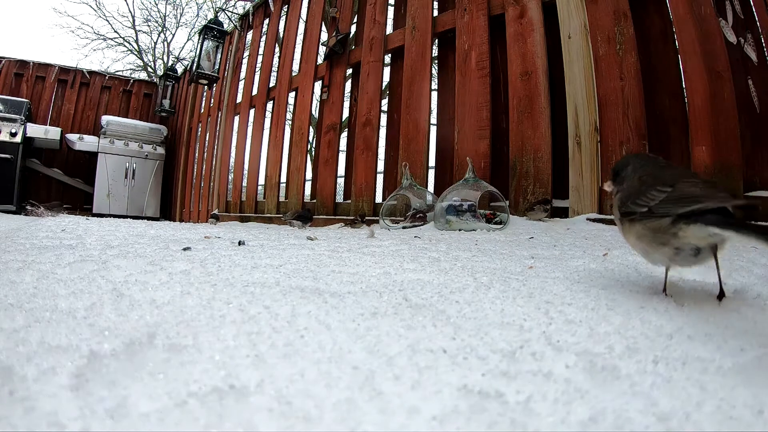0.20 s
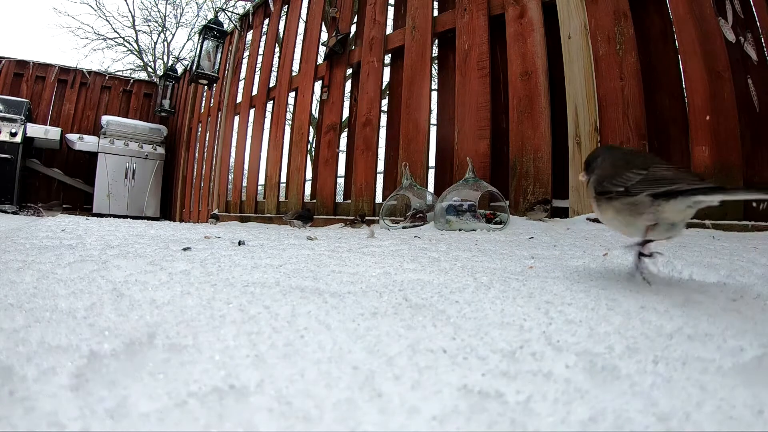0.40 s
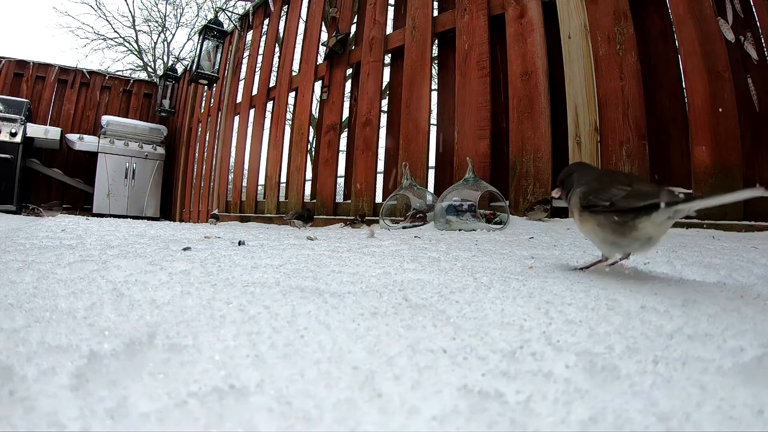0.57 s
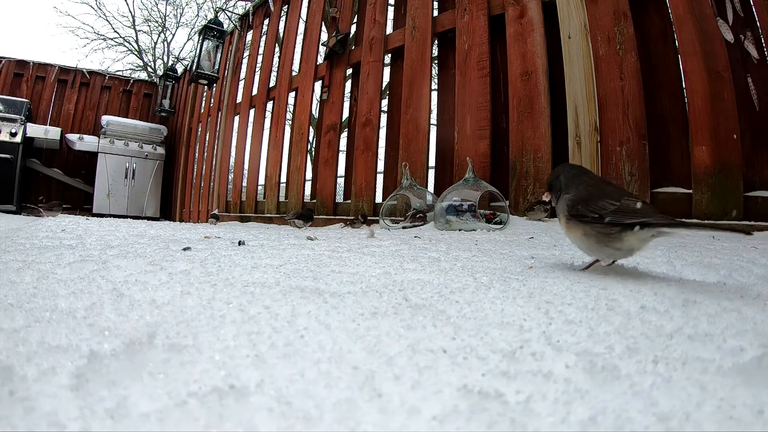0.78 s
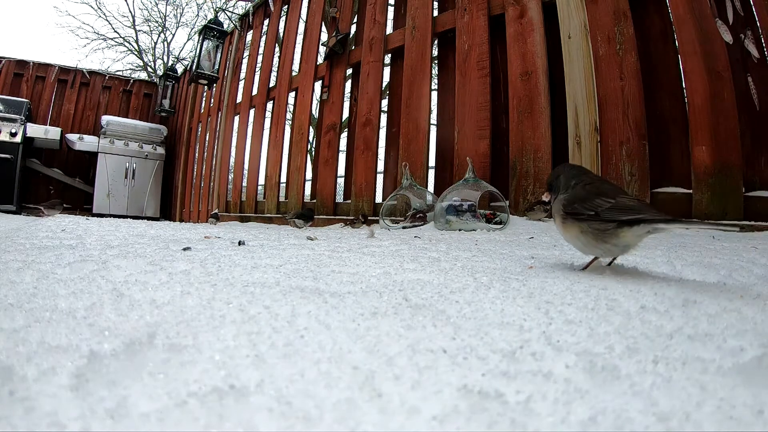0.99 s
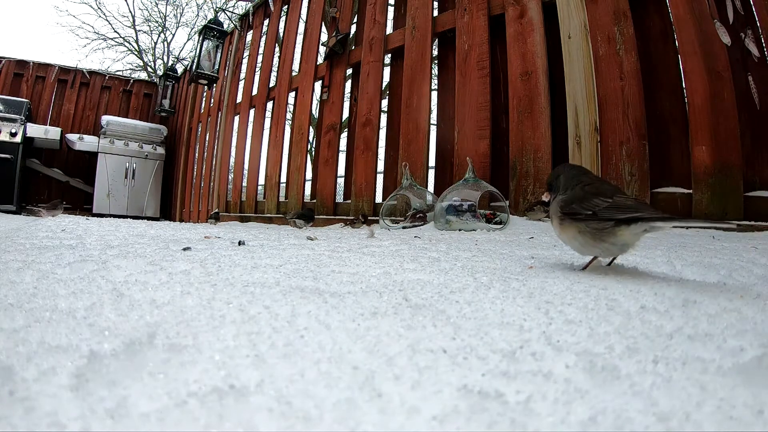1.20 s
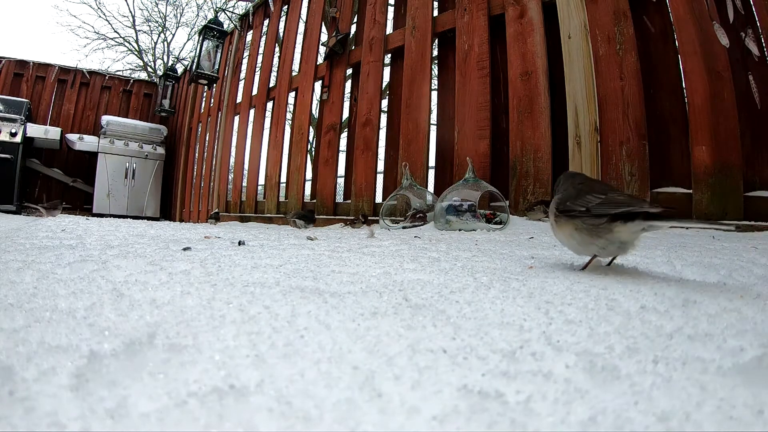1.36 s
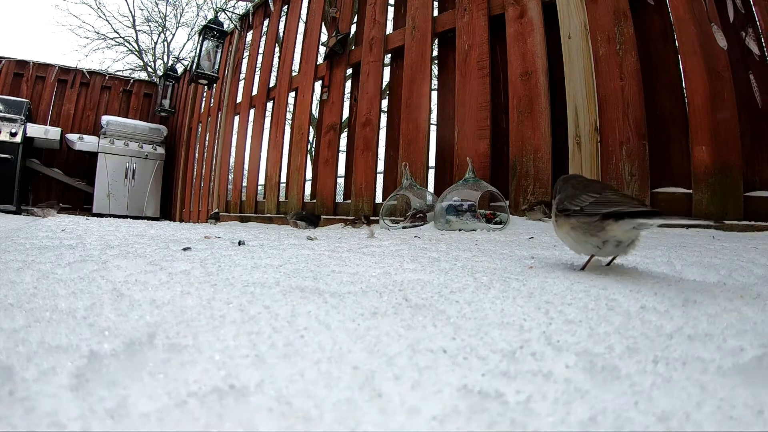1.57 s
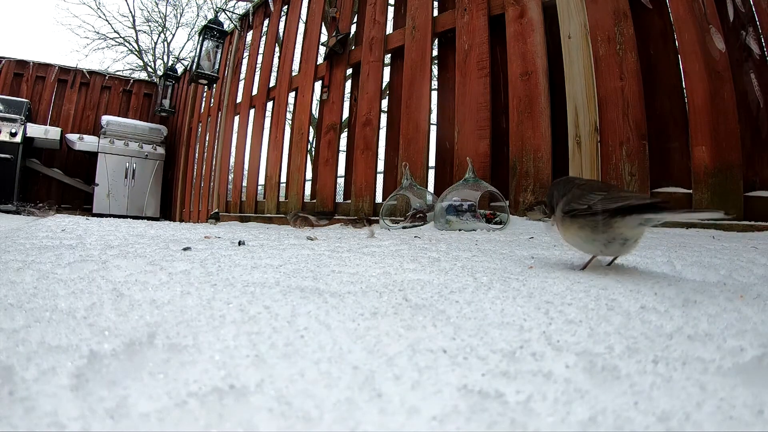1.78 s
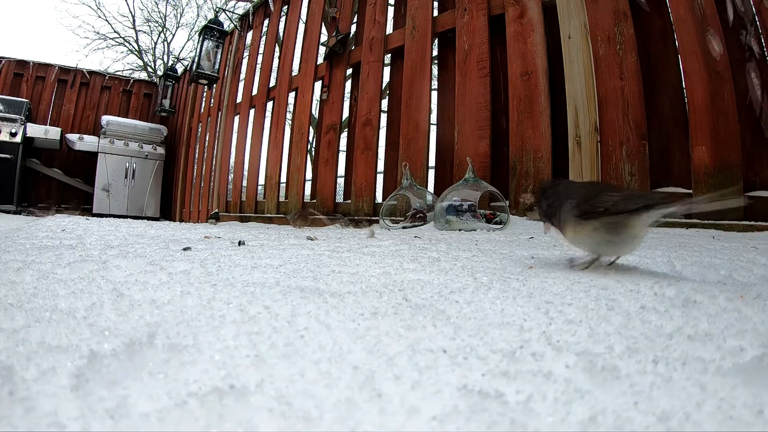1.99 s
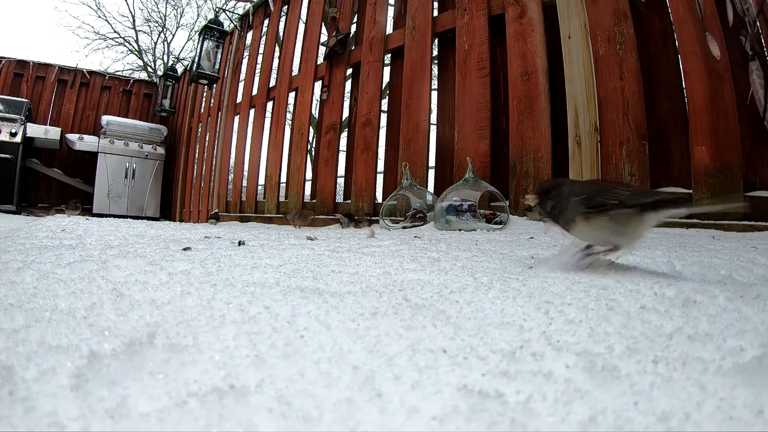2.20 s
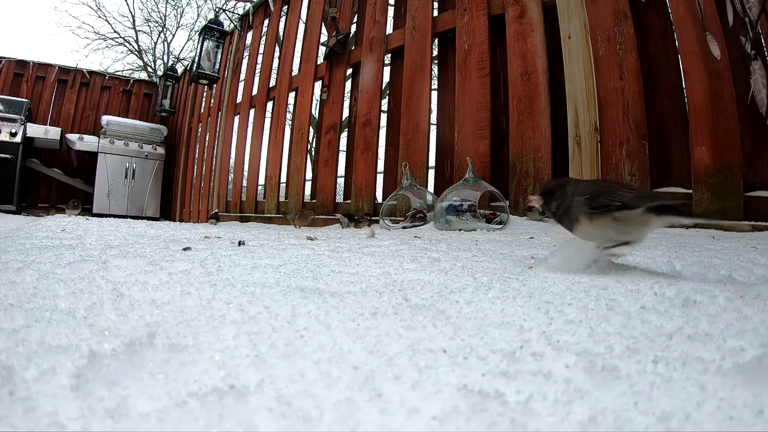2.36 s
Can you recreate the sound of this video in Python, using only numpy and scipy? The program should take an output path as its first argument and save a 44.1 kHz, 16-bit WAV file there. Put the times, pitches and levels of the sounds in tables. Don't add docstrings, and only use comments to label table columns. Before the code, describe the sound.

Ice pellets tick on crusted snow, close and mostly left, over faint distant patter, soft outdoor hush and low wind rumble differing on each side. At 0.2 s a heavy pellet shatters in grains with a deep housing thump. Irregular clicks, skids and small crunches continue, with wind puffs from 0.5 to 1.5 s, denser ticks around 1.2-1.7, and sharp hits and knocks at 2.1-2.25 s.

```python
import sys
import numpy as np
from scipy import signal
from scipy.fft import rfft, irfft
from scipy.io import wavfile
from scipy.ndimage import uniform_filter1d, minimum_filter1d

SR = 44100
rng = np.random.default_rng(int(sys.argv[2]) if len(sys.argv) > 2 else 0)


def store_wav(level_fs):
    pcm = np.round(np.clip(np.atleast_2d(level_fs), -1, 1) * 32767)
    wavfile.write(sys.argv[1], SR, pcm.T.astype(np.int16))


def volts(x):
    e = np.asarray(x, float) / 20
    return 10 ** e


N = 112455

# start_s, peak_db, ring_hz, left_right_db, t60_s
LOUD_PELLETS = [(0.084, -31, 3160, -27, 0.0069), (0.2087, -11.5, 2740, 42, 0.0024),
                (0.3104, -29.5, 6300, 31, 0.0066), (0.3787, -23, 11800, 5, 0.012),
                (0.4297, -25, 12900, 30, 0.0041), (0.5188, -16, 10040, 39, 0.0097),
                (0.7402, -36, 2750, -8, 0.0085), (0.7806, -20, 12800, 21, 0.012),
                (0.9015, -18, 5270, 44, 0.011), (1.0043, -23.5, 5050, 22, 0.0054),
                (1.129, -29.5, 10900, 24, 0.0053), (1.1756, -28, 5130, 22, 0.0089),
                (1.278, -25, 12400, 3, 0.019), (1.3348, -24, 6360, 29, 0.0034),
                (1.4416, -33.5, 3370, 5.5, 0.015), (1.455, -29, 6460, 23, 0.012),
                (1.6024, -26, 6060, 36, 0.0046), (1.999, -28, 12800, 0, 0.015),
                (2.1243, -14, 9700, 40, 0.02), (2.173, -30, 2930, 32, 0.0063),
                (2.1929, -32.5, 6550, 19, 0.0053), (2.415, -32.5, 3230, 20, 0.0065)]
# start_s, peak_db, ring_hz, left_right_db
SOFT_PELLETS = [(0.3834, -31, 3330, 9), (0.4728, -40, 4380, 0), (0.535, -42, 2710, -8),
                (0.5889, -36.5, 12100, 6), (0.637, -40.5, 4610, 18), (0.7187, -40, 4760, 7),
                (0.7988, -39, 8120, -5), (0.822, -35.5, 11500, 12.5), (0.838, -35, 9100, 20),
                (0.952, -31, 11900, 6), (1.034, -35.5, 5730, 3), (1.0452, -32, 7000, 13),
                (1.114, -39, 4460, 11), (1.1375, -40, 3040, 24), (1.1632, -37, 5360, -6),
                (1.243, -39.5, 5600, 18), (1.4148, -29.5, 7990, 17), (1.5695, -33.5, 5230, 20),
                (1.6506, -38.5, 3960, 1), (1.7435, -40, 3130, -12), (1.7944, -32, 9700, 12),
                (1.9057, -33, 6040, 8), (2.0878, -37, 5660, 7), (2.3968, -34.5, 9850, 23),
                (2.4359, -29.5, 11400, 0), (2.4975, -35.5, 5430, 27)]
# start_s, peak_db, ring_hz, left_right_db
MORE_PELLETS = [(.0333, -57, 6670, 2), (0.0547, -42, 5700, -9), (.1336, -53, 5490, -8),
                (0.1798, -41, 8810, -5), (.254, -50, 13000, 25), (0.3493, -43, 6000, 3),
                (0.396, -55, 6040, 5), (0.407, -49, 8900, 2), (.411, -49, 12500, 8), (.458, -50, 10000, 5),
                (.485, -43, 11000, 8), (.498, -46, 7000, 8), (.632, -39, 10000, 8),
                (0.693, -39.5, 7000, 15), (0.9303, -39, 7280, 11), (0.984, -42, 5000, 1),
                (1.1004, -50, 5000, 5), (1.2176, -27, 9670, 26), (1.265, -33, 12500, 8),
                (1.3275, -29, 7460, 14), (1.353, -35, 13000, 3), (1.36, -41, 12000, 10),
                (1.3806, -35, 7500, 0), (1.40, -32, 12100, 8), (1.4093, -32.5, 7000, 19),
                (1.4238, -37, 7500, 10), (1.4394, -30, 12100, 19), (1.464, -43, 8000, 10),
                (1.493, -38.5, 8950, 15), (1.5438, -46, 9000, 10), (1.553, -43, 8000, 10),
                (1.58, -38, 10000, 13), (1.591, -45, 6000, 8), (1.6033, -22.5, 12300, 28),
                (1.619, -39, 12000, 8), (1.6266, -43, 6870, 9), (1.664, -35.5, 10000, 11),
                (1.685, -40, 9000, 0), (1.743, -34, 10900, -1), (1.842, -44, 9000, 3),
                (2.0268, -47, 9000, -5), (2.0717, -36, 7000, 12), (2.114, -50, 11000, 20),
                (2.157, -48, 9000, 16), (2.2283, -48, 9000, 12), (2.2523, -28.5, 6440, 26),
                (2.428, -41, 8000, 12), (2.452, -35, 10500, 16)]
# start_s, level_db, length_s, centre_hz, left_right_db
SPRAYS = [(0.191, -48.5, 0.0093, 8000, 6), (0.2077, -20, 0.0096, 5000, 48), (0.213, -30.5, 0.015, 5500, 34),
          (0.685, -48, 0.032, 5560, 22), (0.737, -34.5, 0.01, 5900, 0), (0.788, -51.5, 0.067, 9000, 6),
          (1.209, -36, 0.004, 7100, 25), (1.294, -40.5, 0.034, 5400, 3), (1.402, -41, 0.022, 8000, 0),
          (1.453, -49, 0.019, 8100, 17), (1.792, -44, 0.024, 9700, 9), (1.924, -37, 0.016, 5000, 5.5),
          (2.125, -21, 0.0033, 6730, 40), (2.13, -35, 0.007, 6900, 28), (2.1705, -30.5, 0.005, 12100, 30),
          (2.308, -33, 0.015, 4500, 5.5), (2.323, -44, 0.015, 3500, 3), (2.402, -46, 0.013, 7000, 20)]
# start_s, level_db, length_s, centre_hz, left_right_db
CRUMBS = [
    (1.284, -38, 0.056, 21000, 7),
    (2.117, -41, 0.0078, 6900, 28),
    (1.9, -43, 0.0099, 4370, 26),
    (3.1, -52, 0.0065, 4300, 24),
    (1.907, -41, 0.0069, 3900, 10),
]
# start_s, peak_db, ring_hz, t60_s
HOUSING_KNOCKS = [(0.208, -8.5, 110, 0.12), (0.2245, -2.5, 48.7, 0.0606), (.246, -16, 28.4, .2),
                  (0.2093, -22, 2580, 0.067), (0.218, -15, 367, 0.041), (.903, -33.5, 2090, 0.066),
                  (2.072, -16, 287, 0.013), (2.127, -20.5, 249, 0.033), (2.132, -19.5, 110, 0.075),
                  (2.177, -18.5, 115, 0.013), (2.2526, -5.5, 2890, 0.0044), (2.252, -17, 1490, 0.0063)]
# start_s, peak_db, centre_hz, t60_s
NOISY_KNOCKS = [(.209, -21, 760, 0.057), (0.209, -23, 3020, 0.057), (.518, -37, 730, 0.021),
                (0.837, -40.5, 1500, 0.047), (0.877, -36, 950, 0.04), (0.9, -24.5, 845, 0.019),
                (1.51, -38, 740, 0.024), (1.925, -34, 437, 0.09), (2.072, -31, 1390, 0.02),
                (2.125, -22, 1490, 0.018), (2.128, -34.5, 320, 0.095), (2.252, -31.5, 487, 0.029),
                (2.1737, -29.5, 1540, 0.018), (2.415, -36, 870, 0.013)]
# time_s, level_db, left_right_db
GUSTS = [
    (0, -41, -2.5),
    (.35, -43, 2.5),
    (1.1, -39, -2),
    (1.7, -42, -1.5),
    (2.55, -43, 2.5),
]
# top_s, over_wind_db, half_length_s, port (1 left, -1 right)
PUFFS = [
    (0.513, 9, 0.039, -1),
    (0.701, 7.9, 0.056, 1),
    (.70, 8, 0.069, -1),
    (.885, 13, 0.035, -1),
    (.94, 8, 0.11, 1),
    (1.02, 8.1, 0.08, -1),
    (1.26, 7.3, 0.074, -1),
    (1.35, 8.5, 0.11, 1),
    (1.48, 5, 0.073, -1),
]
# freq_hz, density_db_per_hz
WIND_SPECTRUM = [(20, 2), (50, 3), (80, -7), (165, -18.5), (350, -31), (600, -37.5)]
# freq_hz, density_db_per_hz
HUSH_SPECTRUM = [(110, -10), (220, -3.5), (770, -7), (1200, -11), (4000, -22), (11000, -27), (14500, -28.5),
                 (16000, -40)]


def band(x, centre_hz, share, order=1):
    edges_hz = np.clip([centre_hz / (1 + share), centre_hz * (1 + share)], 20, 0.47 * SR)
    return signal.lfilter(*signal.butter(order, edges_hz, "band", fs=SR), x)


def add(out, x, start_s, left_right_db):
    far_delay_s, far_cutoff_hz = 0.001124, 5000
    gain_sum = volts(left_right_db / 2) + volts(-left_right_db / 2)
    for port, sign in enumerate((1, -1)):
        far = sign * left_right_db < 0
        first = int((start_s + far * far_delay_s) * SR)
        heard = x[port]
        if far:
            heard = signal.lfilter(*signal.butter(1, far_cutoff_hz, fs=SR), heard)
        part = out[port, first:first + len(heard)]
        part += heard[:len(part)] * 2 * volts(sign * left_right_db / 2) / gain_sum


def tick(peak_db, ring_hz, t60_s):
    attack_s, tail_db, tail_t60_s, crack_db = 0.00058, -44.5, 0.014, -5
    t = np.arange(1800) / SR
    noise = rng.standard_normal((2, len(t)))
    decay = volts(-60 * t / t60_s) + volts(tail_db - 60 * t / tail_t60_s)
    shape = np.clip(t / attack_s, 0, 1) * decay
    ring = band(noise * shape, ring_hz, 0.35, order=2)
    crack = band(noise[::-1] * shape, 6000, 1.8, order=2)
    crack_gain = volts(crack_db) * min(ring_hz / 5000, 1) ** 3
    x = ring / abs(ring).max() + crack_gain * crack / abs(crack).max()
    return x * volts(peak_db) / abs(x).max(axis=1, keepdims=True)


def spray(level_db, length_s, centre_hz, share=1.36):
    grains_per_s, grain_spread_db, dust = 1200, 5, 0.4
    t = np.arange(6000) / SR
    chance = rng.random((2, 2, len(t)))
    grain_db = np.minimum(-grain_spread_db * np.log(chance[1] + 1e-9), 9)
    grains = (chance[0] < grains_per_s / SR) * volts(grain_db)
    density = signal.lfilter([1], [1, -0.97], grains) + dust
    x = band(density * rng.standard_normal((2, len(t))), centre_hz, share, order=2)
    swell = np.clip(t / (0.0013 + 0.098 * length_s), 0, 1)
    tail = np.exp(-np.clip(t - length_s, 0, 1) / (0.4 * length_s))
    shape = swell * volts(-7 * t / length_s) * tail
    return x / x[:, t < length_s].std(axis=1, keepdims=True) * shape * volts(level_db)


def pellets():
    out = np.zeros((2, N))
    for start_s, peak_db, ring_hz, left_right_db, t60_s in LOUD_PELLETS:
        add(out, tick(peak_db, ring_hz, t60_s), start_s, left_right_db)
    for start_s, peak_db, ring_hz, left_right_db in SOFT_PELLETS:
        add(out, tick(peak_db, ring_hz, 0.011), start_s, left_right_db)
    for start_s, level_db, length_s, centre_hz, left_right_db in SPRAYS:
        add(out, spray(level_db, length_s, centre_hz), start_s, left_right_db)
    return out


def housing_knocks():
    out = np.zeros((2, N))
    t = np.arange(9000) / SR
    for start_s, peak_db, ring_hz, t60_s in HOUSING_KNOCKS:
        ring = np.sin(2 * np.pi * ring_hz * t) * volts(peak_db - 60 * t / t60_s) / 2
        add(out, np.tile(ring, (2, 1)), start_s, 28)
    return out


def noisy_knocks():
    out = np.zeros((2, N))
    t = np.arange(9000) / SR
    for start_s, peak_db, centre_hz, t60_s in NOISY_KNOCKS:
        noise = rng.standard_normal((2, len(t))) * volts(-60 * t / t60_s)
        x = band(noise, centre_hz, 0.78, order=2)
        add(out, x * volts(peak_db) / abs(x).max(), start_s, 24)
    return out


def strays():
    out = np.zeros((2, N))
    for start_s, peak_db, ring_hz, left_right_db in MORE_PELLETS:
        add(out, tick(peak_db, ring_hz, 0.0055), start_s, left_right_db)
    for start_s, level_db, length_s, centre_hz, left_right_db in CRUMBS:
        add(out, spray(level_db, length_s, centre_hz, share=0.66), start_s, left_right_db)
    return out


def far_patter():
    rate_per_s, base_db, spread_db, left_right_db = 190, -58, 4.5, 7
    out = np.zeros((2, N))
    chance = rng.random((600, 4))
    starts_s = np.cumsum(-np.log(chance[:, 0])) / rate_per_s
    for start_s, (_, size, pitch, side) in zip(starts_s, chance):
        if start_s < N / SR:
            peak_db = base_db + min(-spread_db * np.log(size), 12)
            x = tick(peak_db, 3000 * 4 ** pitch, 0.003)
            add(out, x, start_s, left_right_db + 30 * (side - 0.5))
    return out


def walk(rate_hz):
    hold = int(SR / rate_hz)
    steps = np.repeat(rng.standard_normal((2, N // hold + 1)), hold, axis=1)
    return 0.86 * uniform_filter1d(uniform_filter1d(steps, hold), hold)[:, :N]


def coloured(spectrum, flicker_db, flicker_hz):
    hz, db = np.array(spectrum).T
    bins_hz = np.fft.rfftfreq(N, 1 / SR) + 1
    gain = volts(np.interp(np.log(bins_hz), np.log(hz), db))
    out = np.zeros((2, N))
    for octave in np.arange(0, np.log2(hz[-1] / hz[0]) + 0.5, 0.5):
        centre_hz = hz[0] * 2 ** octave
        part = np.clip(1 - 2 * abs(np.log2(bins_hz / centre_hz)), 0, 1) ** 0.5
        noise = irfft(rfft(rng.standard_normal((2, N))) * gain * part, N)
        out += noise * volts(flicker_db * walk(flicker_hz))
    return out / np.sqrt(np.mean(out ** 2))


def wind():
    time_s, gust_db, left_right_db = np.array(GUSTS).T
    t = np.arange(N) / SR
    tilt_db = np.outer([0.5, -0.5], np.interp(t, time_s, left_right_db))
    level_db = np.interp(t, time_s, gust_db) + tilt_db + 4.0
    for top_s, over_wind_db, half_length_s, port in PUFFS:
        level_db[int(port < 0)] += over_wind_db * np.exp(-((t - top_s) / half_length_s) ** 2)
    return coloured(WIND_SPECTRUM, 2.57, 9) * volts(level_db)


def hush():
    port_db = np.array([[-53.5], [-56.5]])
    return coloured(HUSH_SPECTRUM, 2.6, 11) * volts(port_db)


def scene():
    top_soften_hz = 13250
    ice = pellets() + strays() + far_patter()
    softened = signal.lfilter(*signal.butter(1, top_soften_hz, fs=SR), ice)
    return softened + housing_knocks() + noisy_knocks() + wind() + hush()


def starve(x):
    below_click_db, quiet_db, treble_hz = -8, -83.5, 3500
    hz, _, z = signal.stft(x, SR, nperseg=256)
    power_db = 10 * np.log10(uniform_filter1d(abs(z) ** 2, size=5, axis=1) + 1e-18)
    click_db = -minimum_filter1d(-power_db, size=11, axis=2)
    masked = power_db < click_db + below_click_db
    lost = masked & (power_db < quiet_db) & (hz[:, None] > treble_hz)
    return signal.istft(z * ~lost, SR, nperseg=256)[1][:, :N]


def low_pass(x):
    return signal.sosfilt(signal.butter(12, 17000, fs=SR, output="sos"), x)


def record(dry):
    squash, top_hz = 1.4, 15900
    rounded = np.tanh(squash * dry) / squash
    top_cut = signal.ellip(6, 0.5, 32, top_hz, fs=SR, output="sos")
    mix = starve(signal.sosfilt(top_cut, rounded))
    return low_pass(mix)


dry = scene()
out = record(dry)
store_wav(out)
```